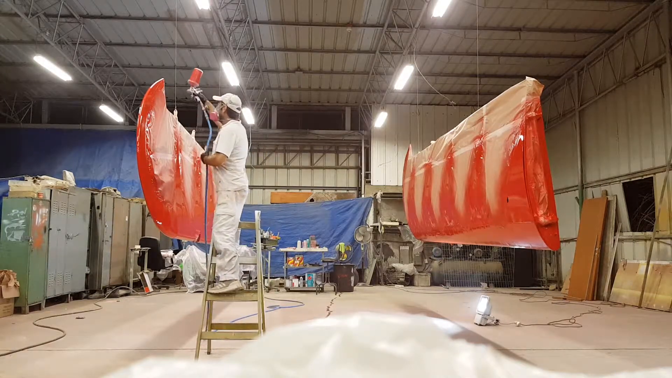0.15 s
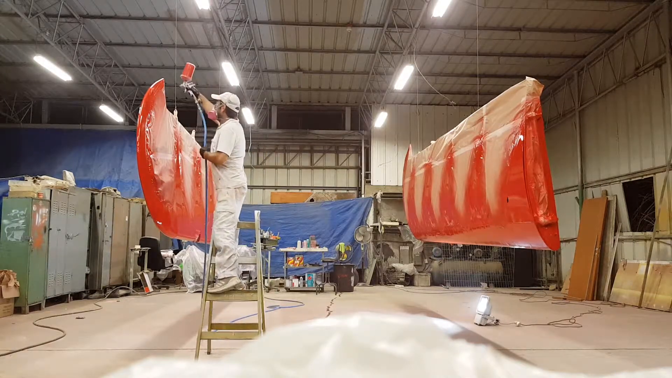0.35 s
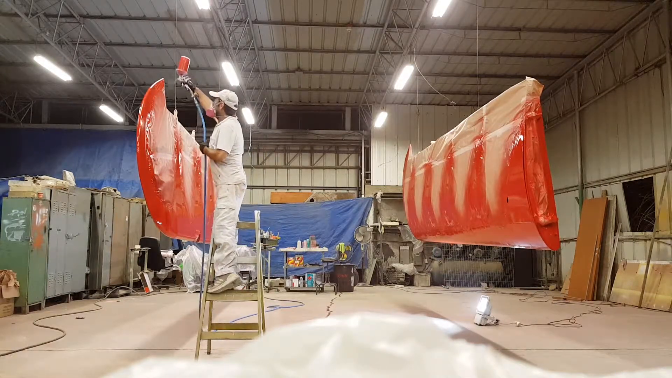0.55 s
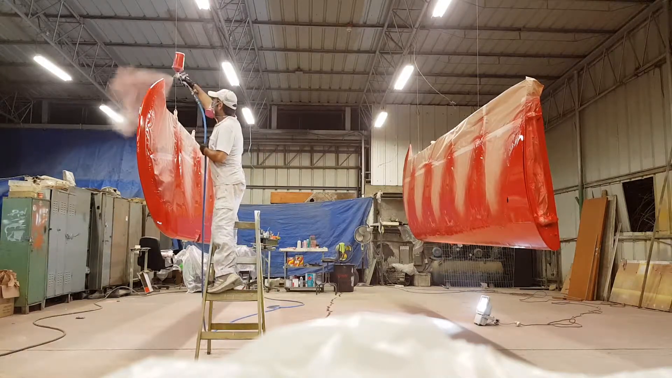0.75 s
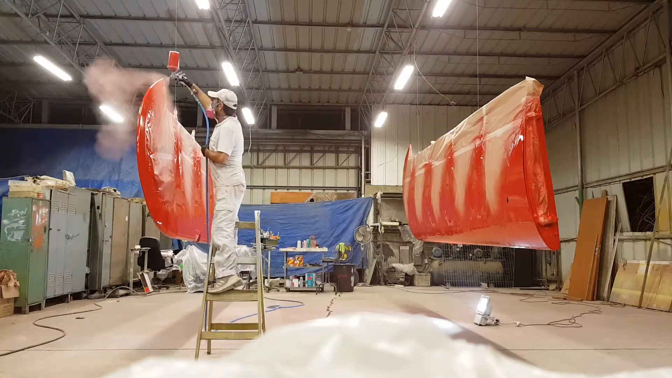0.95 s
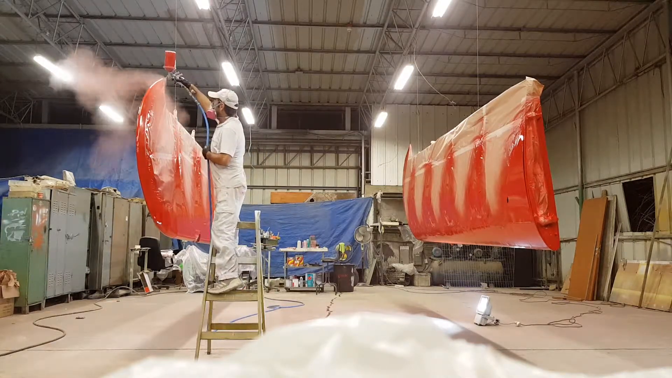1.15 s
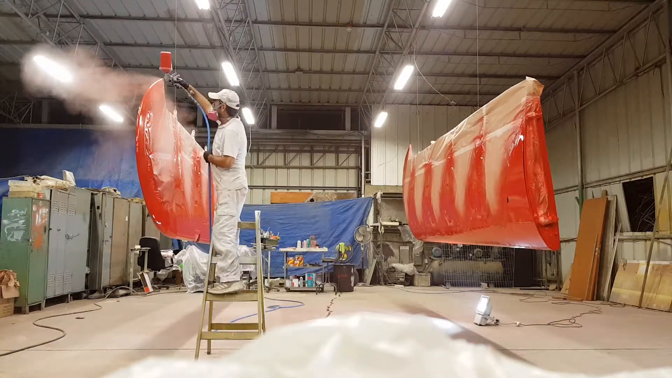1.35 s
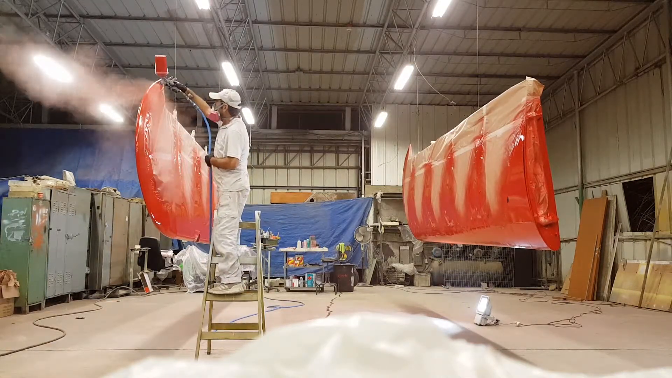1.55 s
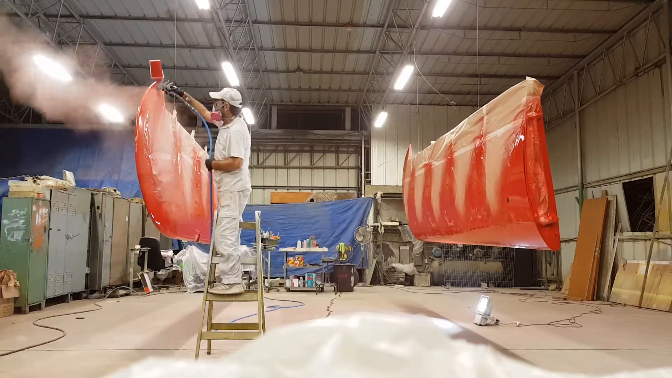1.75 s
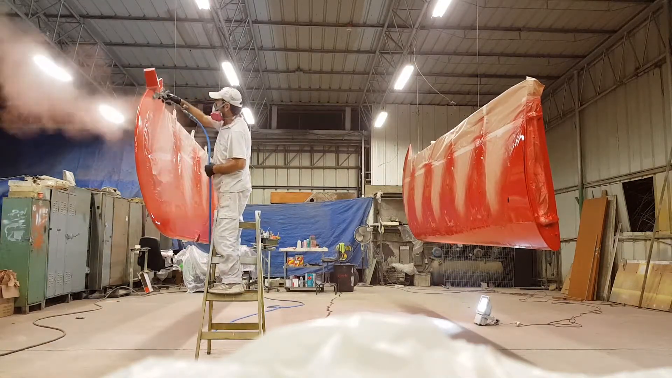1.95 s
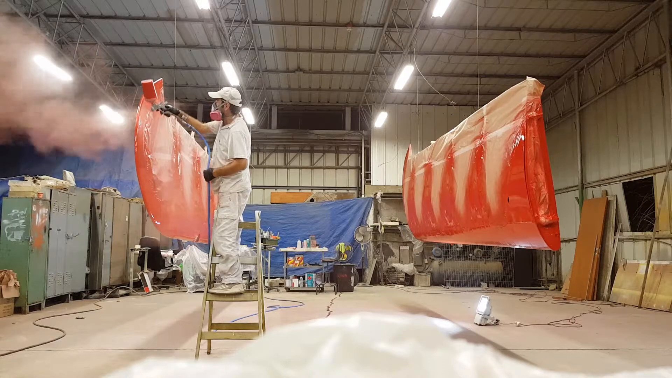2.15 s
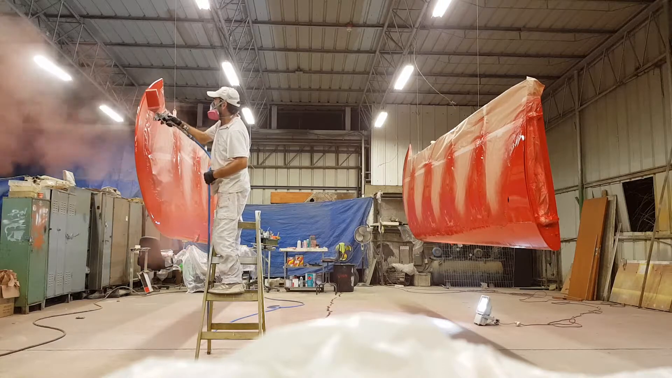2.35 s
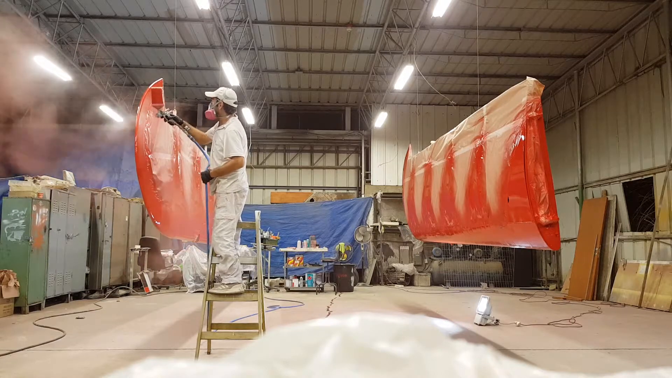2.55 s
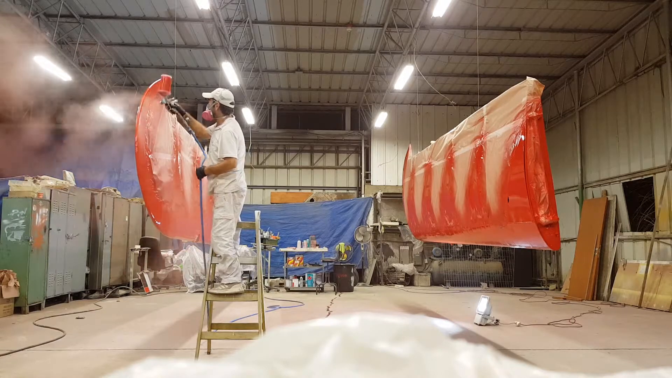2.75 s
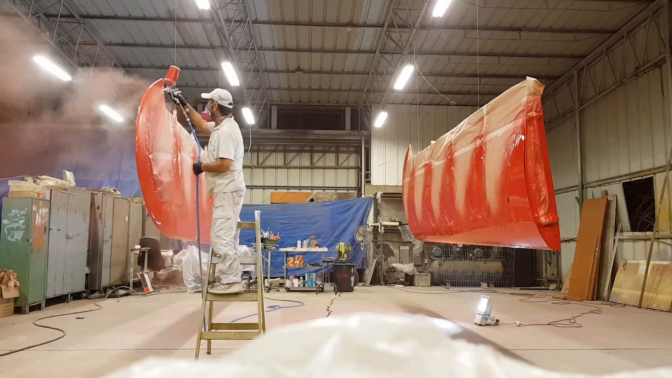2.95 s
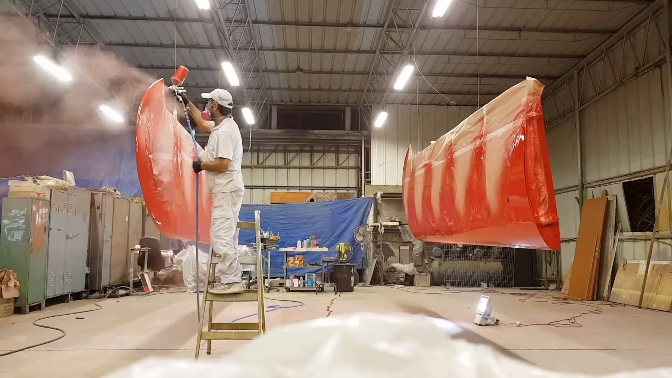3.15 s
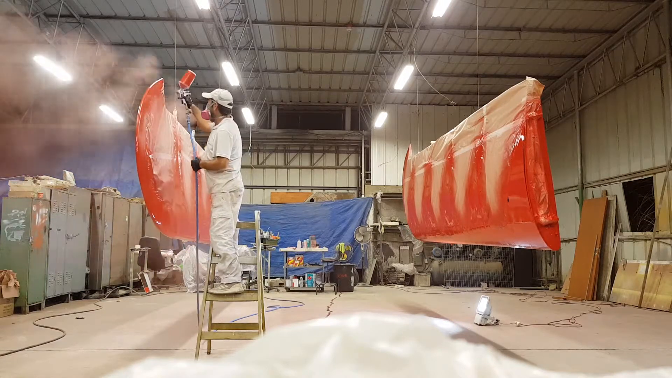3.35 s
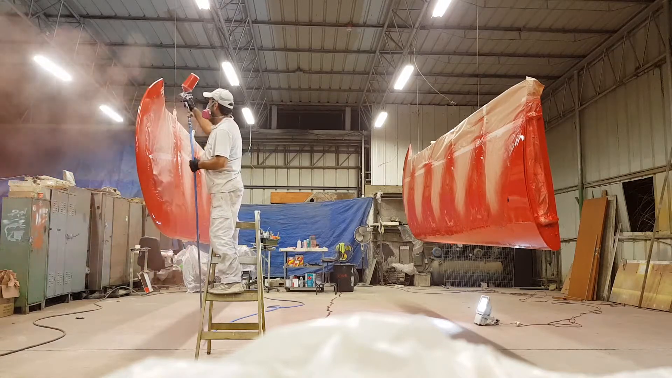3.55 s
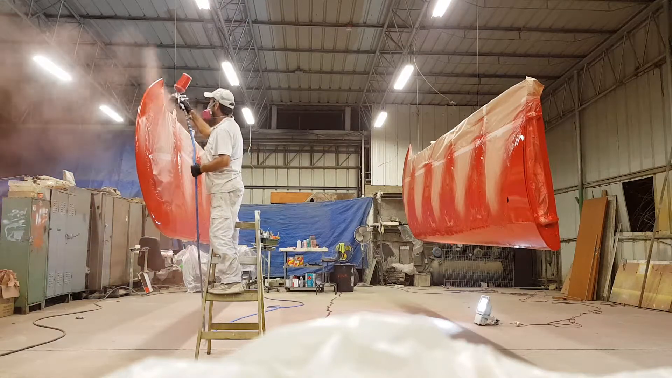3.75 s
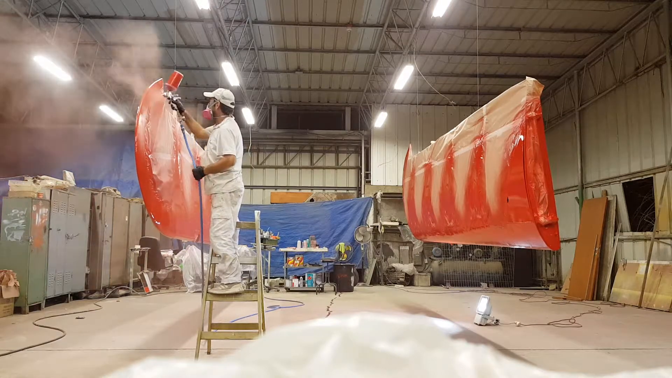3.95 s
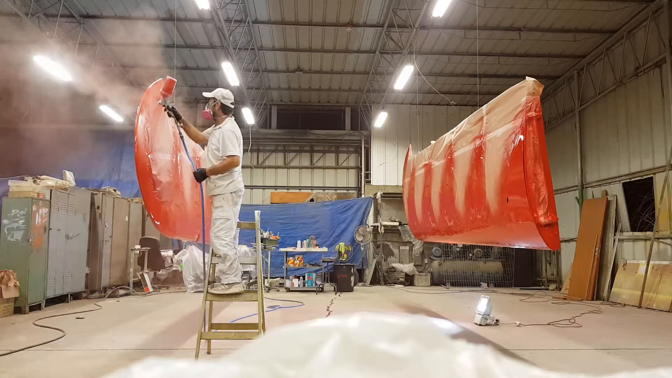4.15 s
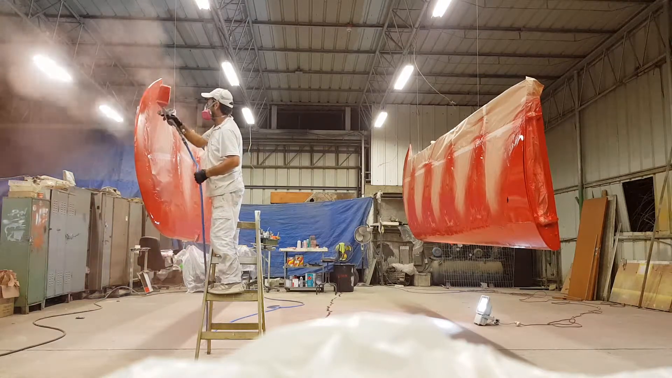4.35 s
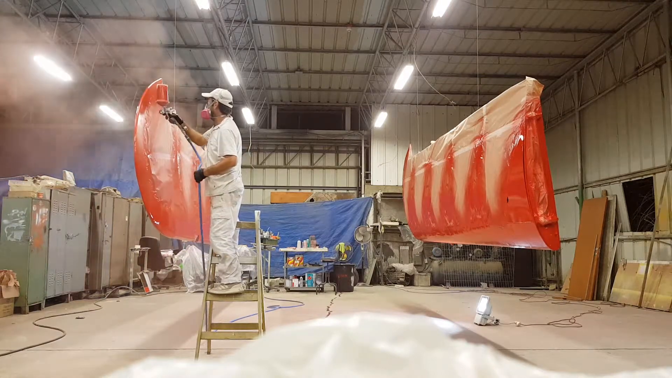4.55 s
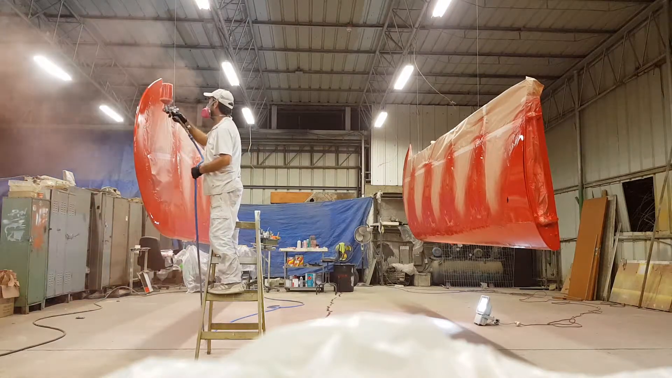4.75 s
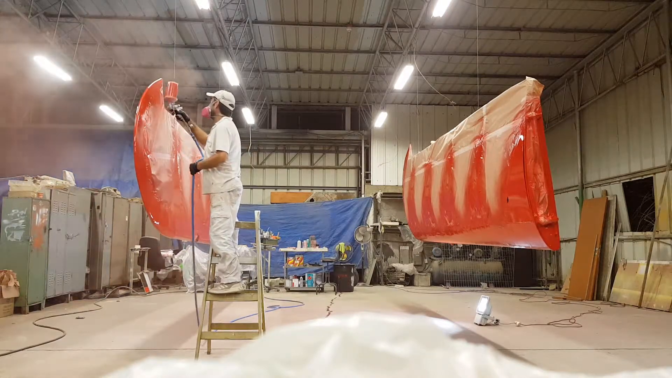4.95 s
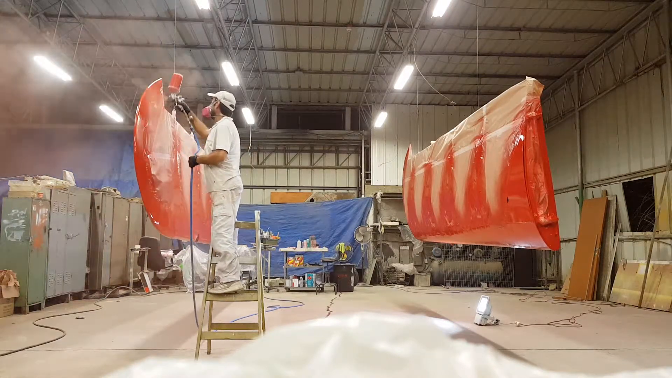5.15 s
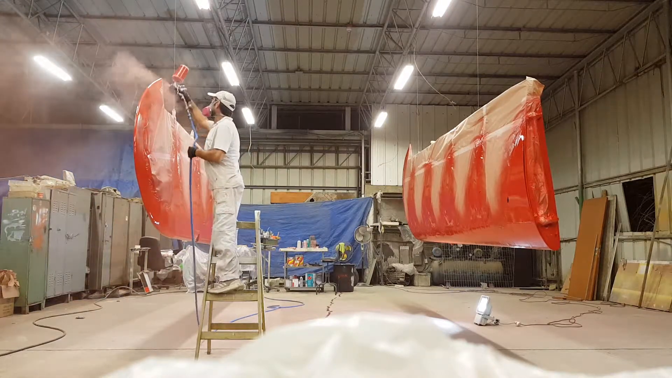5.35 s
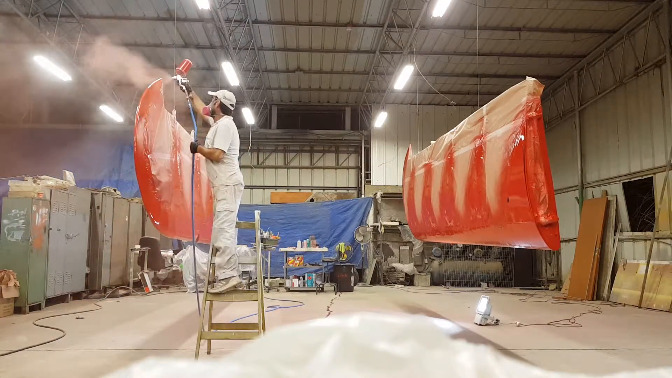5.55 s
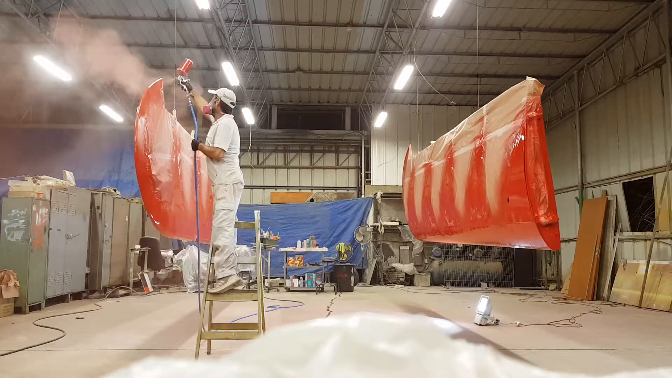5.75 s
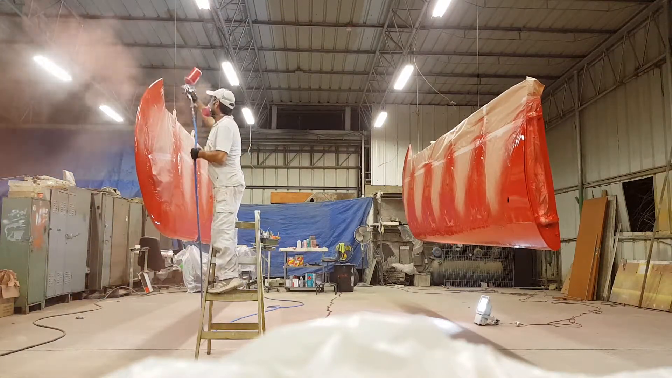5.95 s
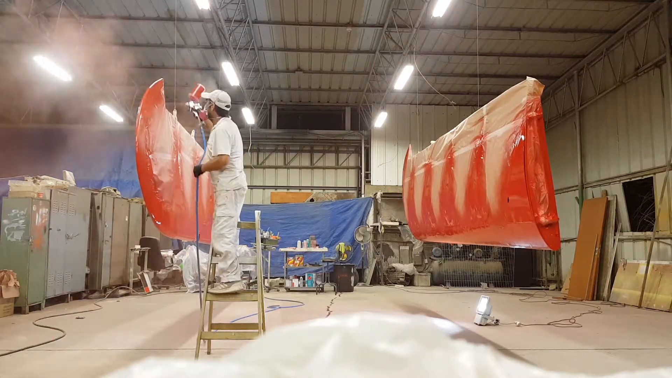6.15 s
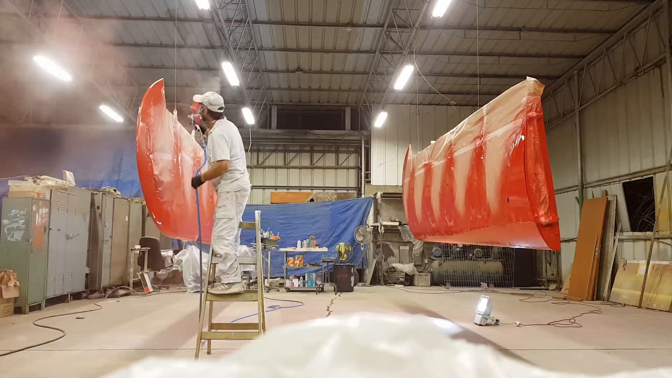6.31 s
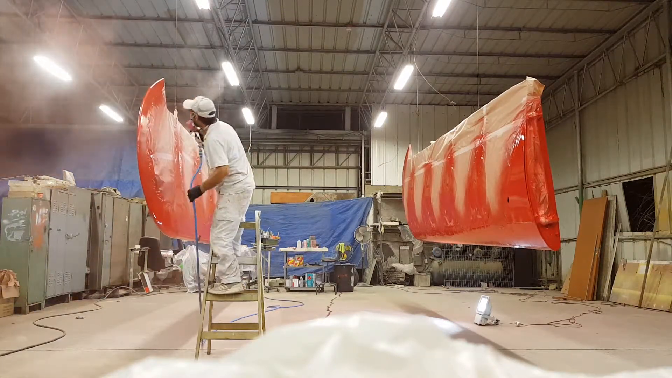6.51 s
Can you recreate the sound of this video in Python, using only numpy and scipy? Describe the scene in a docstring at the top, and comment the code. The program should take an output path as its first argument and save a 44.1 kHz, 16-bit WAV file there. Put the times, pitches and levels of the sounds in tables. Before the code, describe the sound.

After a small trigger click, compressed air hisses in long and short paint passes, then shuts off into an echoing hall with a quiet fan.

```python
"""A hangar, microphone pair a few metres from a painter working a compressed-air spray gun over a hanging panel.
A fan hums and rushes throughout, as wavering harmonics and shaped noise; the trigger ticks and a little air leaks.
The valve opens and bare air hisses, as bright noise; four full pulls each load the jet with paint, which dulls it
and makes it roar on the panel, as a gliding resonance. Low gusts flutter at the panel's edge.
At last the valve shuts, and the hall carries the hiss on as scattered, decaying noise."""
import sys
import numpy as np
from scipy import signal
from scipy.fft import rfft, irfft
from scipy.io import wavfile

SR = 44100
rng = np.random.default_rng(int(sys.argv[2]) if len(sys.argv) > 2 else 0)


def dump_mix(stems):
    """Bounce the given channels to the path in sys.argv[1] as a 16-bit WAV at rate SR."""
    frames = np.atleast_2d(stems).T  # one column per channel
    limited = np.clip(frames, -1, 1)  # hard clip at full scale
    pcm = np.round(limited * 32767).astype(np.int16)
    wavfile.write(sys.argv[1], SR, pcm)


N = 294588
TIME, BINS = np.arange(N) / SR, np.fft.rfftfreq(N, 1 / SR)  # s, Hz
VALVE_OPENS_S, VALVE_SHUTS_S = 0.5414, 5.912


def amp(db):
    """Decibels to gain."""
    return 10 ** (np.asarray(db) / 20)


def unit(x):
    """Scales to rms 1."""
    return x / np.sqrt(np.mean(x ** 2) + 1e-20)


def at_hz(points, hz):
    """Reads a table of frequencies and values on a log-frequency axis."""
    table_hz, value = np.transpose(points)
    return np.interp(np.log(hz + 1), np.log(table_hz + 1), value)


def colour(x, db):
    """Filters by a gain in dB given for every bin."""
    return irfft(rfft(x) * amp(db), N)


def noise(db):
    """Noise of rms 1 with the given spectrum."""
    return unit(colour(rng.standard_normal(N), db))


def wander(rate_hz):
    """Slow random drift of rms 1, up to about the given rate."""
    lowpass = (BINS > 0) / (1 + (BINS / rate_hz) ** 2)
    return unit(irfft(rfft(rng.standard_normal(N)) * lowpass, N))


def needle(start, end, squeeze_s=0.085, ease_s=0.057):
    """How far one pull opens the paint needle, 0-1."""
    opening = np.clip((TIME - start) / squeeze_s, 0, 1)
    closing = np.clip((end - TIME) / ease_s, 0, 1)
    return opening * closing


# Spectrum of the jet without paint. Each row: frequency in Hz, relative level in dB per Hz.
BARE_JET = [(300, -42), (1300, -22.5), (2200, -16), (3200, -14), (4500, -9), (6500, -8), (9000, -3),
            (11500, -0.5), (14000, 0.5), (15700, -5.5)]
# Spectrum of the jet loaded with paint. Each row: frequency in Hz, relative level in dB per Hz.
WET_JET = [(100, -25), (300, -17.5), (700, -14.5), (1200, -9), (2000, -8), (3200, -5.5), (4500, -3.5),
           (6500, -4), (9000, -1), (11500, -0.5), (14000, -0.5), (15700, -7)]
# Fixed peaks and dips in the hiss. Each row: centre in Hz, width in Hz, height in dB.
HISS_PEAKS = [(3500, 300, 1.2), (4700, 400, 2.6), (5200, 330, -2.3), (5950, 550, 2.8), (8050, 550, 4.8),
              (13650, 950, 2), (14900, 500, -.8)]
# Loudness of the jet as the gun is moved and turned. Each row: time in seconds, level change in dB.
AIM = [(.55, -0.6), (1.0, -1), (1.55, -0.4), (2.35, 1.2), (3.3, -0.67), (4.3, 1.04), (4.7, 0.9),
       (5.12, 1.5), (5.4, -0.8)]
# Full pulls of the trigger, one for each pass over the panel, for the jet here and the roar below.
# Each row: start in seconds, end in seconds, paint flow (0-1), roar at mid-pass in dB, growth of the roar
# in dB per second, resonance at mid-pass in Hz, share by which it is higher at the ends of the pass.
PULLS = [(.605, 2.28, 0.81, -48.5, -4, 1520, .02), (2.55, 3.381, 0.87, -46.5, 17, 1593, .1),
         (3.645, 4.302, 0.82, -45, 13, 1604, .15), (5.145, 5.801, 0.8, -40.5, 3, 1535, .18)]


def jet(flutter_db=0.04, flutter_hz=25, spatter_db=1.0, spatter_hz=240):
    """Turbulence at the nozzle; paint damps the finest eddies and feeds the coarse ones."""
    bare_db, wet_db = -18, -22
    bare_lift_db = 0.77  # the jet is this much stronger without paint to carry
    dribble = 0.08  # paint flow with the trigger half pulled, 0-1

    paint = np.full(N, dribble)
    for start, end, flow, *_ in PULLS:
        paint += (flow - dribble) * needle(start, end)
    paint = np.clip(paint, 0, 1)

    peaks_db = sum(db / (1 + (2 * (BINS - hz) / width) ** 2) for hz, width, db in HISS_PEAKS)
    bare = amp(bare_db) * noise(at_hz(BARE_JET, BINS) + peaks_db)
    wet = amp(wet_db) * noise(at_hz(WET_JET, BINS) + peaks_db)
    wet = wet * amp(spatter_db * wander(spatter_hz))  # the paint tears into drops unevenly
    mixed = (1 - paint) * bare + np.sqrt(paint) * wet

    air_db = np.interp(TIME, *np.transpose(AIM)) + bare_lift_db * (1 - paint)
    return amp(air_db + flutter_db * wander(flutter_hz)) * mixed


def panel_roar(width_hz=190):
    """Paint rings the gap from panel to nozzle: a hollow resonance that sinks and rises again in each pass."""
    # the first slug of paint of each pull: level, delay, half length
    spit_db, spit_at_s, spit_s = -43, 0.085, 0.048
    pole = np.exp(-np.pi * width_hz / SR)
    white = rng.standard_normal(N) + 1j * rng.standard_normal(N)
    band = signal.lfilter([1], np.poly([pole, pole]), white)  # narrow noise around 0 Hz
    roar = np.zeros(N)
    for start, end, _, db, growth, mid_hz, rise in PULLS:
        length = end - start
        t = np.clip(TIME - start, 0, length)
        off_centre = (2 * t / length - 1) ** 2  # 0 at mid-pass, 1 at the ends
        hz = mid_hz * (1 + rise * off_centre)
        carrier = np.exp(2j * np.pi * np.cumsum(hz) / SR)
        resonance = unit((band * carrier).real)  # the band moved up to the gliding frequency
        swell = amp(db + growth * (t - length / 2)) * np.sqrt(abs(1 - off_centre))
        spit = amp(spit_db) * np.exp(-((t - spit_at_s) / spit_s) ** 2)
        roar += needle(start, end) * np.hypot(swell, spit) * resonance
    return roar


# Gusts of the jet at the panel's edge. Each row: middle in seconds, level in dB, half length in seconds.
BUFFETS = [(.93, -43.5, 0.091), (1.243, -46, 0.15), (3.25, -43.5, 0.17), (3.92, -43, 0.1),
           (5.38, -49, 0.12)]
# Spectrum of the gusts. Each row: frequency in Hz, relative level in dB per Hz.
BUFFET_TONE = [(40, -22), (110, 5), (200, -5), (400, -0.5), (800, -15), (1200, -1), (3000, -42)]


def buffeting():
    """A low flutter where the jet spills over the edge of the panel."""
    gusts = sum(amp(db) * np.exp(-((TIME - s) / half) ** 2) for s, db, half in BUFFETS)
    return gusts * noise(at_hz(BUFFET_TONE, BINS))


def valve(rise_s=0.015, fall_s=0.066):
    """The air valve snaps open and closes a little more slowly."""
    opening = np.clip((TIME - VALVE_OPENS_S) / rise_s, 0, 1)
    closing = np.clip((VALVE_SHUTS_S - TIME) / fall_s, 0, 1)
    return opening * closing


# Small ticks of the trigger taking up its slack. Each row: start in seconds, level in dB.
TICKS = [(.418, -28), (.434, -45)]


def trigger_ticks(decay_s=0.002, low_hz=3000, leak_db=-64):
    """The trigger ticks against the valve stem, and a thread of air leaks before the valve lifts."""
    bright_db = -10 * np.log10(1 + (low_hz / (BINS + 1)) ** 4)
    ticks = sum(amp(db) * (TIME >= s) * np.exp(-abs(TIME - s) / decay_s) for s, db in TICKS)
    leak = amp(leak_db) * (TIME > TICKS[0][0]) * (TIME < VALVE_OPENS_S)
    return (ticks + leak) * noise(bright_db)


def echoes(t, t60, build):
    """How the energy of dense echoes builds up and dies away; it sums to 1."""
    energy = np.clip(t / build, 0, 1) * amp(-60 * t / t60) ** 2
    return energy / energy.sum(-1, keepdims=True)


# Likeness of diffuse sound at the two microphones. Each row: frequency in Hz, left-right correlation (-1 to 1).
ALIKE = [(60, 0.94), (150, 0.89), (300, 0.25), (600, 0.42), (1000, -0.15), (1300, -0.54), (1800, -0.015),
         (2400, 0.38), (3500, -0.049), (4800, -0.00038), (9000, 0.039)]


def diffuse(pair):
    """Mixes two unrelated signals so they agree most in the bass, as at two close microphones."""
    size = pair.shape[1]
    alike = np.clip(at_hz(ALIKE, np.fft.rfftfreq(size, 1 / SR)), -1, 1)
    shares = np.sqrt([(1 + alike) / 2, (1 - alike) / 2])
    mid, side = irfft(rfft(pair) * shares, size)
    return np.array([mid + side, mid - side])


# Decay of the hall. Each row: frequency in Hz, time to fall by 60 dB in seconds.
HANGAR = [(250, 1.7), (2000, 0.34), (5000, 1.1), (9500, 0.73), (15000, 0.44)]


def hangar(x, direct_db=-6.5, near_db=-5.0, near_t60=0.1, near_build=0.0044, hall_db=-4.0, hall_build=0.012):
    """Direct sound from the left, quick scatter off floor and panel, and the hall's slower decay (times in s)."""
    frames = dict(fs=SR, nperseg=512, noverlap=384)
    hz, t, bands = signal.stft(x, **frames)
    near = amp(near_db) ** 2 * echoes(t, near_t60, near_build)
    hall = amp(hall_db) ** 2 * echoes(t, at_hz(HANGAR, hz)[:, None], hall_build)
    lingering = abs(signal.fftconvolve(abs(bands) ** 2, near + hall, axes=1)[:, :len(t)])
    # countless paths from a moving gun scramble the phase: only the energy in each band carries over
    scrambled = signal.stft(rng.standard_normal((2, N)), **frames)[2]
    scrambled *= np.sqrt(lingering / np.mean(abs(scrambled) ** 2))
    scattered = signal.istft(scrambled, **frames)[1][:, :N]
    right_delay_s = 0.00015
    late = irfft(rfft(x) * np.exp(-2j * np.pi * BINS * right_delay_s), N)
    return amp(direct_db) * np.array([x, late]) + diffuse(scattered)


# Partials of the fan, whose balance slowly shifts.
# Each row: multiple of the fan's rate, early level in dB, change in dB by the end.
FAN = [(2, -53, 0), (3, -58, -2.5), (4, -61.5, 9), (5, -63, 0), (6, -63.5, 0.5), (7, -59.5, -3),
       (8, -54.5, -9.5), (9, -62, 0), (11, -63.5, 0), (12, -62.5, -0.5)]


def fan_hum(waver_db=1.5, waver_hz=2, drift_rad=0.37):
    """Harmonics of the fan's rotation, each wavering in the hall, with a trace of mains hum."""
    fan_hz, mains_hz, mains_db = 66.15, 99.2, -60
    shift_at_s, shift_s = 3.35, 1.6  # middle and half length of the shift in balance
    shift = (1 + np.tanh((TIME - shift_at_s) / shift_s)) / 2
    # the lowest partial slowly swells and fades
    throb_period_s, throb_top_s = 2.4, 2.1
    throb_db = -59 + 5 * np.cos(2 * np.pi * (TIME - throb_top_s) / throb_period_s)

    lines = [(multiple * fan_hz, db + change * shift) for multiple, db, change in FAN]
    lines += [(fan_hz, throb_db), (mains_hz, mains_db)]
    hum = np.zeros(N)
    for hz, db in lines:
        phase = 2 * np.pi * (hz * TIME + rng.random()) + drift_rad * wander(waver_hz)
        level = amp(db + waver_db * wander(waver_hz))
        hum += np.sqrt(2) * level * np.sin(phase)  # sqrt(2) makes the level an rms
    return hum


# Spectrum of the rush of the fan and air line. Each row: frequency in Hz, relative level in dB per Hz.
RUSH = [(22, -18), (45, -3), (65, 0.5), (90, -6.5), (220, 0), (400, -4.5), (800, -2), (1300, -3),
        (2200, -3.5), (3400, -4), (5000, -12), (6600, -18), (8200, -17.5), (12000, -20), (15700, -25)]


def fan_rush(rush_db=-40.5):
    """Steady moving air that fills the hall."""
    pair = np.array([noise(at_hz(RUSH, BINS)) for _ in range(2)])
    return amp(rush_db) * diffuse(pair)


def scene():
    """The gun in the hall, over the fan."""
    gun = valve() * (jet() + panel_roar() + buffeting()) + trigger_ticks()
    return hangar(gun) + fan_hum() + fan_rush()


# How the two microphones differ. Each row: frequency in Hz, left minus right in dB.
MIC_BALANCE = [(100, 1), (1500, 1.4), (3000, -0.9), (4700, 0), (6000, -2), (7300, 1), (8300, 4.5),
               (9200, 4), (10500, 4), (12000, -1.5), (13800, 3), (15500, -14)]


def record(dry, edge_hz=15800):
    """Each microphone has its own colour; then the band limit."""
    halves_db = np.array([[1], [-1]]) * at_hz(MIC_BALANCE, BINS) / 2
    heard = colour(dry, halves_db)
    lowpass = signal.firwin(1023, edge_hz, window=("kaiser", 8), fs=SR)
    return signal.oaconvolve(heard, lowpass[None], "same")


dry = scene()
out = record(dry)
dump_mix(out)
```